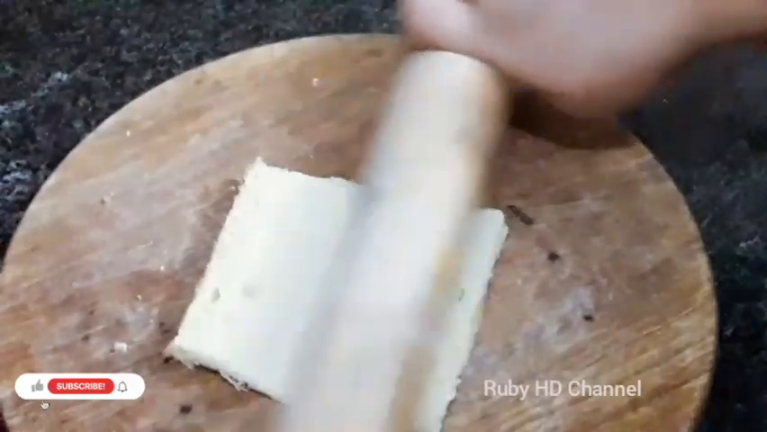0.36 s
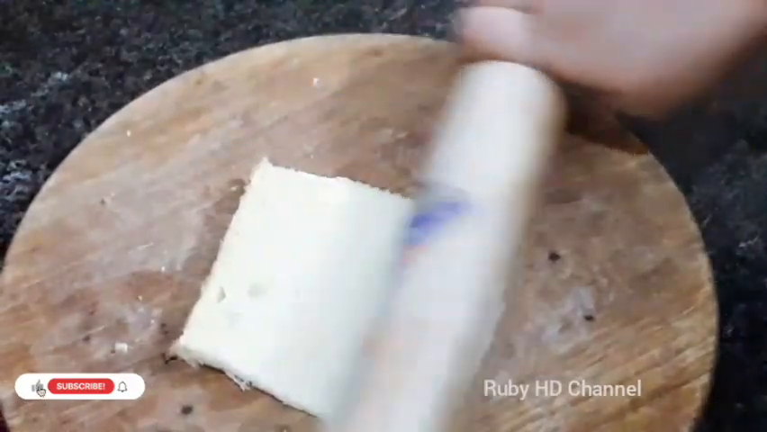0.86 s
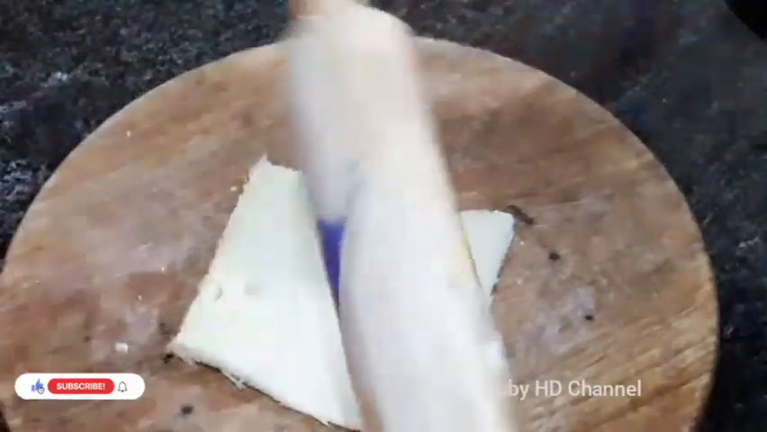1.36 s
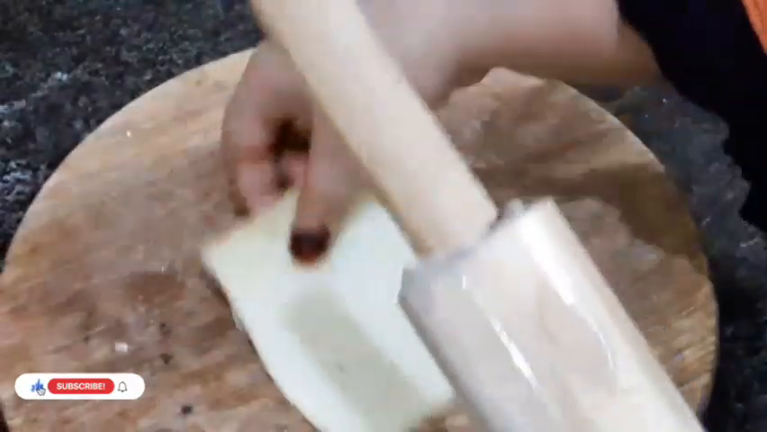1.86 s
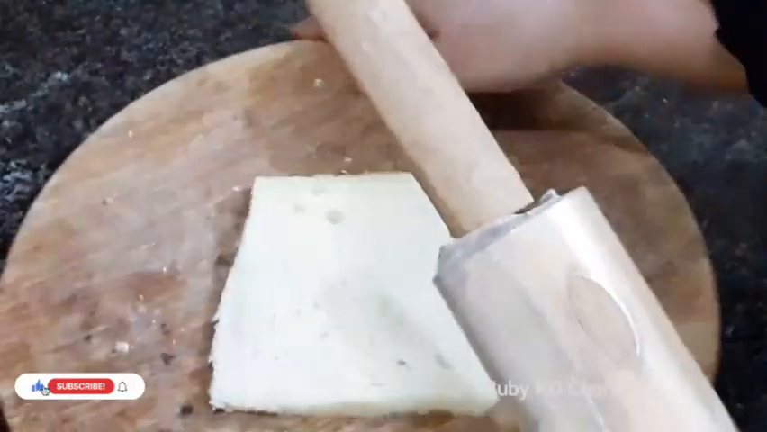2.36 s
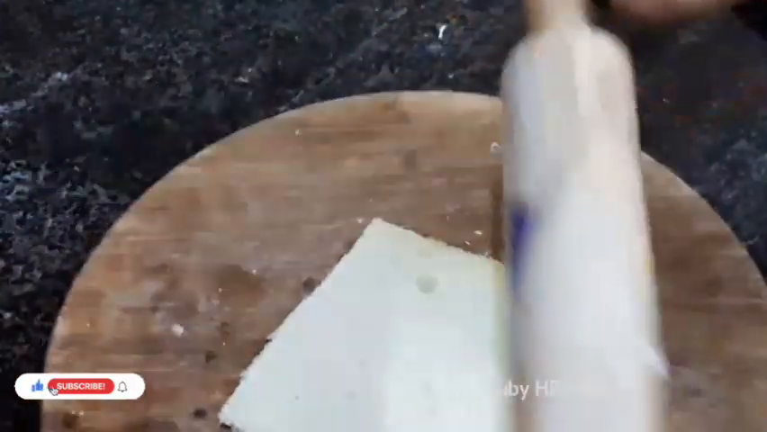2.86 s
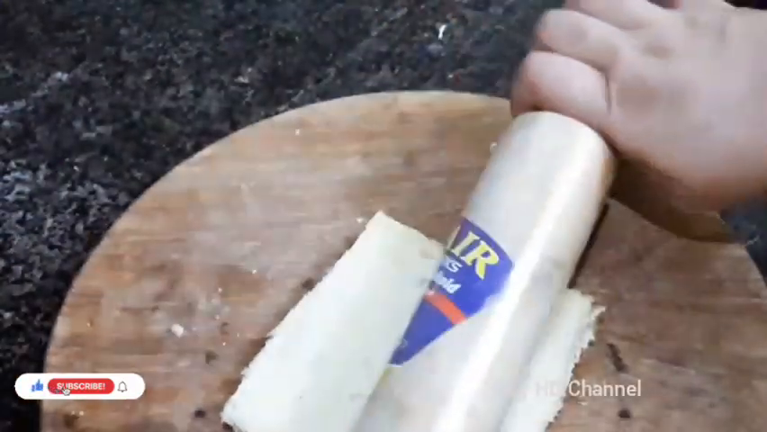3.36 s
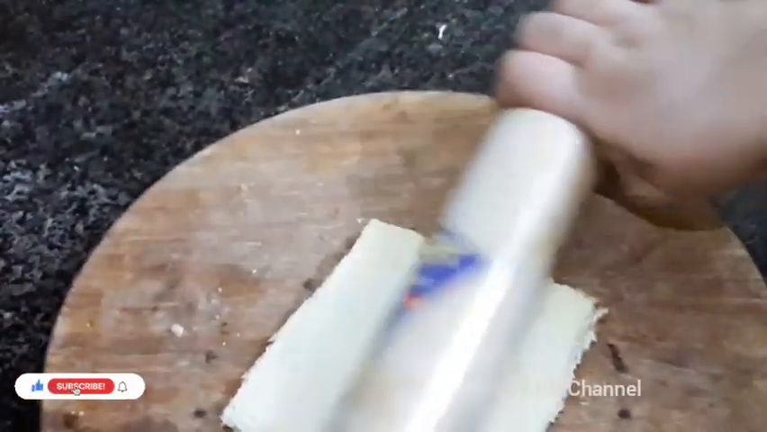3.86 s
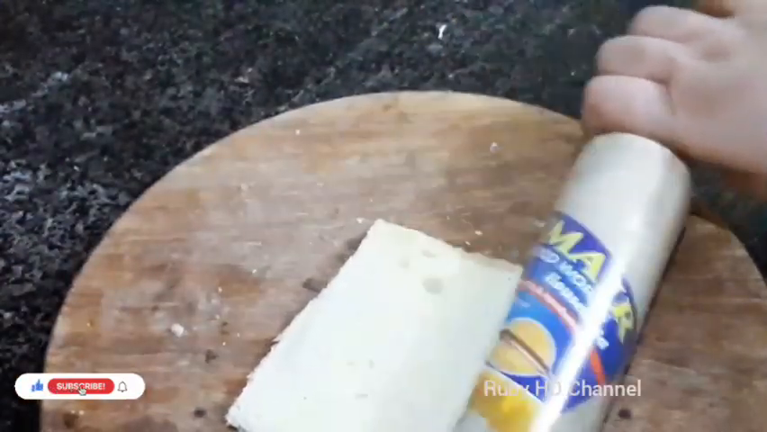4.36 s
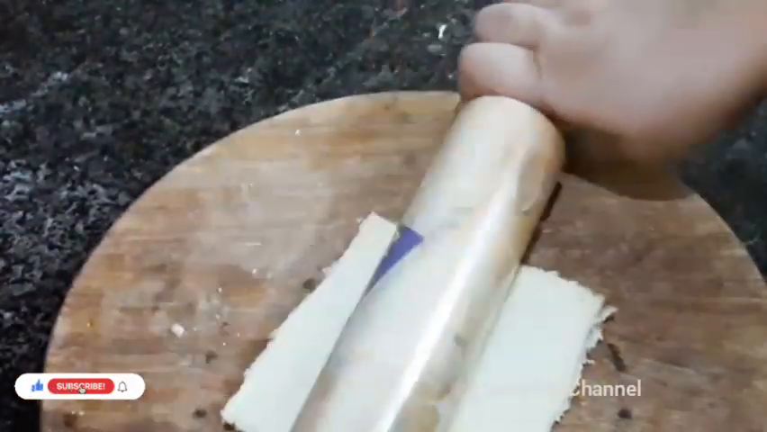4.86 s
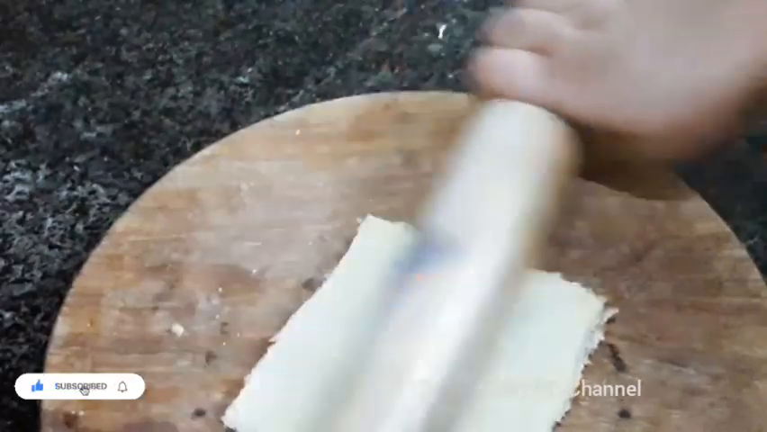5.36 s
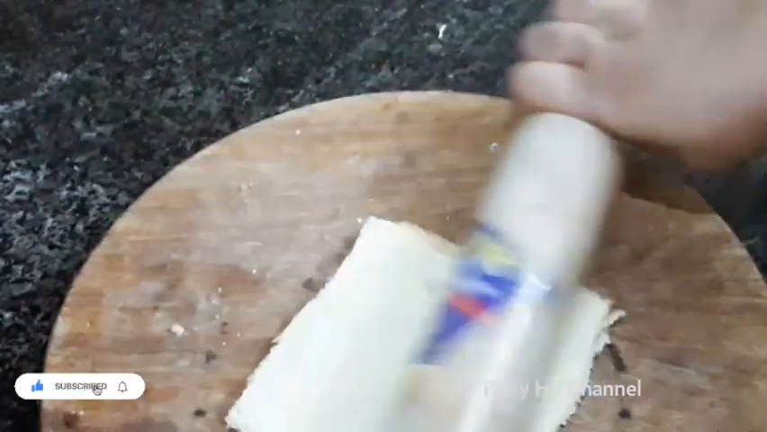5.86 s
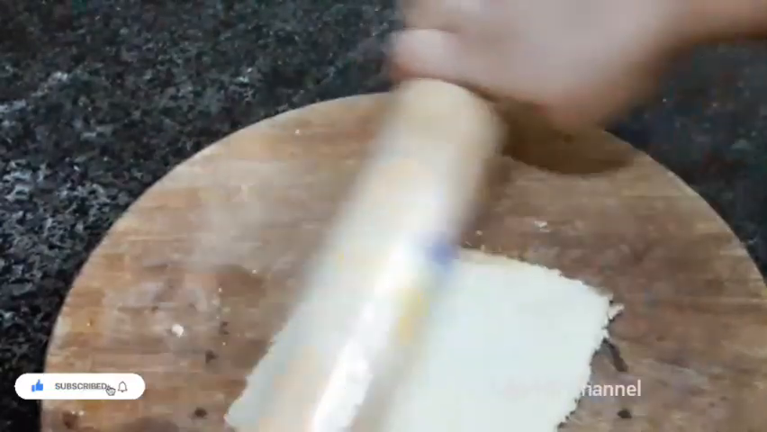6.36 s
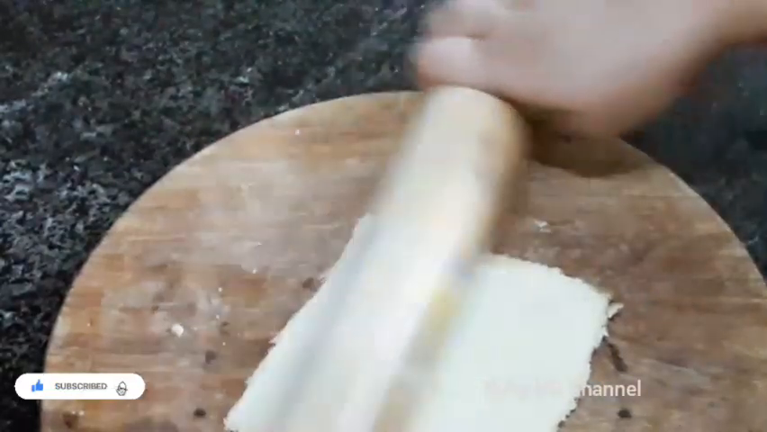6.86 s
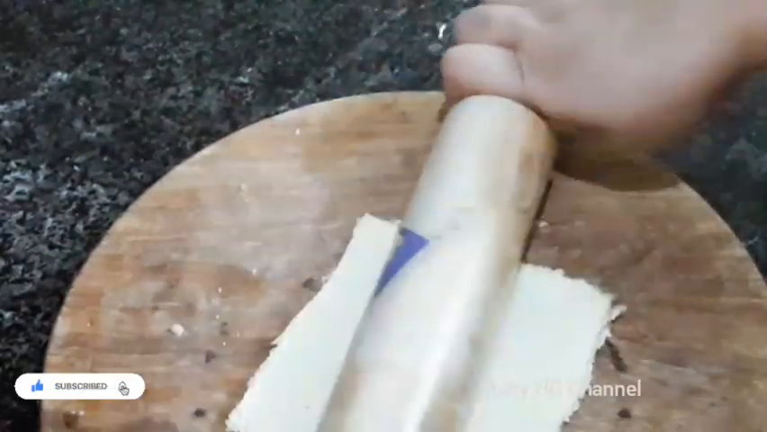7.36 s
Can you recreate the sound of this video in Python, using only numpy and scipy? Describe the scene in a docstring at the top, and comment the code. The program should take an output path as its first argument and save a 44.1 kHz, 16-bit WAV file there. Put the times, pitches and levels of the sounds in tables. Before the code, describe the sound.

A rolling pin whispers to and fro on a wooden board, interrupted by sharp dish clinks and a short scrape, then rolls harder.

```python
"""In a live kitchen a wooden pin rolls to and fro over bread on a round board, palms rubbing its handles.
Rolling is stick-slip noise in spectral layers, swelling with each stroke; the handles squeak as gliding tones.
Puffs of resonant noise make ticks, bumps and thuds; coarse slips drag the board once over a low groan that
moves on as thuds under the crockery; hard crockery clinks as ringing modes. Filtered noise gives a low thrum,
a faint whistle, hum and hiss under all."""
import sys
import numpy as np
from scipy import signal
from scipy.fft import rfft, irfft
from scipy.io import wavfile
from scipy.ndimage import uniform_filter1d

SR = 44100
rng = np.random.default_rng(int(sys.argv[2]) if len(sys.argv) > 2 else 0)


def to_linear_factor(level_db):
    """Convert decibel levels (scalar or array-like) to linear amplitude factors."""
    exponent = np.asarray(level_db, float) / 20
    return 10 ** exponent


def master_out(mix):
    """Clip the mix to full scale and print it as 16-bit PCM to the path in sys.argv[1]."""
    frames = np.transpose(np.atleast_2d(mix))
    ceiling = np.clip(frames, -1, 1)
    pcm = np.round(ceiling * 32767).astype(np.int16)
    wavfile.write(sys.argv[1], SR, pcm)


N = 329438  # length of the scene in samples

# spectra of the rub, the rasp, the top hiss and the deep rasp: (frequency [Hz], density [dB per Hz])
RUB_COLOUR = [(2060, -74), (3500, -22.5), (4160, 1), (4840, 6), (5620, 7), (6930, 3), (7300, 1.5),
              (8220, -21.5), (9000, -65), (11700, -51), (19800, -120)]
RASP_COLOUR = [(1500, -29), (2100, -5), (2600, 6.5), (3200, 11.5), (3800, 9.5), (4500, -20)]
HISS_COLOUR = [(5000, -21), (8500, -4.5), (9980, -1.5), (11000, 2.5), (13600, 4.5), (15800, -5)]
DEEP_COLOUR = [(600, -43), (1000, -11.5), (1400, -10.5), (1900, 2), (2300, 5), (3000, -59)]
# strokes of pin and hands: (start [s], length [s], place of the peak [0-1], rub level [dB],
# rasp above the rub [dB], top hiss above the rub [dB])
STROKES = [(-0.03, 0.066, 0.63, -60, -17, -16), (0.01, 0.17, 0.5, -63.3, -2.5, -15),
           (0.242, 0.14, 0.29, -54, -10.5, -12), (0.371, 0.18, 0.34, -55.5, -6, -10.5),
           (0.536, 0.18, 0.48, -58.5, -7, -6), (0.7, 0.17, 0.32, -59, -3, -8.2),
           (0.884, 0.24, 0.26, -55.5, -9.5, -6), (1.673, 0.155, 0.37, -73.5, -12, -10),
           (1.8, 0.14, 0.07, -66.4, -8, -19), (1.89, 0.34, 0.47, -63.5, -15, -10),
           (2.317, 0.195, 0.15, -62.5, -17, -15), (3.439, 0.17, 0.24, -46, -9, -12.5),
           (3.638, 0.24, 0.3, -47, -15.5, -13.5), (3.785, 0.23, 0.46, -45.5, -11.5, -13.5),
           (3.952, 0.25, 0.26, -47.6, -13.5, -15), (4.072, 0.23, 0.58, -49, -11.5, -15),
           (4.268, 0.25, 0.16, -48, -14.5, -13), (4.431, 0.33, 0.2, -48.5, -11.5, -11.5),
           (4.747, 0.196, 0.42, -62.5, -13, -6.5), (4.9, 0.2, 0.4, -64, -18, -4),
           (5.098, 0.21, 0.53, -44.5, -14, -12), (5.251, 0.25, 0.61, -44.2, -12, -11.5),
           (5.514, 0.25, 0.38, -45, -13.5, -11.5), (5.713, 0.21, 0.49, -48.5, -14, -11),
           (5.877, 0.26, 0.14, -50, -13.5, -8.5), (6.074, 0.34, 0.28, -45, -9, -10.5),
           (6.289, 0.4, 0.41, -60.5, -10, -9.1), (6.483, 0.24, 0.37, -58, -5.5, -6.2),
           (6.674, 0.29, 0.35, -56.5, -13.5, -7.5), (6.836, 0.2, 0.38, -59, -17.5, -3.1),
           (6.983, 0.22, 0.66, -41.5, -12.5, -11.5), (7.169, 0.26, 0.61, -45.5, -10.5, -11.5),
           (7.361, 0.16, 0.61, -45.1, -12, -11)]
# the arch of every stroke, a row each for rub, rasp and top hiss: (delay [s], sharpness [exponent])
STROKE_ARCHES = [(0.0012, 3.4), (0.017, 2.37), (0.0022, 4)]
# moments when the rubbing bites deeper: (time [s], deep rasp level [dB], burst of rub level [dB])
GRINDS = [(.285, -74, -57), (1.81, -71, -74), (3.48, -55, -50), (3.68, -75, -48), (3.895, -59, -51),
          (4.03, -69.5, -51), (4.52, -70, -47.5), (4.61, -68, -58), (5.205, -63.5, -43), (5.4, -63, -47.5),
          (5.62, -69.5, -55), (5.83, -81, -51.5), (6.175, -53.5, -44), (6.26, -64, -64), (6.54, -70, -58.5),
          (7.115, -59, -39.5), (7.333, -53.5, -44), (7.46, -63, -48)]


def rolling():
    """One train of stick-slip clicks feeds the two rasps, the rub and the top hiss."""
    drive = slips(5000, spread_db=0.0, smooth=2.4)
    rub = coloured(drive, RUB_COLOUR, patchy_db=4.0)
    rasp = coloured(drive, RASP_COLOUR, patchy_db=2.5)
    hiss = coloured(drive + 3.1 * rng.standard_normal(N), HISS_COLOUR, patchy_db=2.0)
    deep_rasp = coloured(drive, DEEP_COLOUR, patchy_db=3)

    peak, rub_db, rasp_db, hiss_db = np.transpose(STROKES)[2:]
    levels_db = [rub_db, rub_db + rasp_db, rub_db + hiss_db]
    rub_gain, rasp_gain, hiss_gain = [arches(STROKES, db, peak, sharp, delay_s)
                                      for db, (delay_s, sharp) in zip(levels_db, STROKE_ARCHES)]

    burst = swells(GRINDS, 2, rise_db_per_s=602, fall_db_per_s=282)
    burst_hiss_db = -10.5  # against the burst of rub
    rub_gain = np.hypot(rub_gain, burst)
    hiss_gain = np.hypot(hiss_gain, to_linear_factor(burst_hiss_db) * burst)
    deep_gain = swells(GRINDS, 1, rise_db_per_s=458, fall_db_per_s=160)
    return rub_gain * rub + rasp_gain * rasp + hiss_gain * hiss + deep_gain * deep_rasp


# the handle squeaks in the palm: (start [s], length [s], level [dB], first pitch [Hz], last pitch [Hz])
SQUEAKS = [(0.971, .075, -67, 3580, 3550), (1.043, .06, -65, 3360, 3750), (5.157, .065, -61.5, 2900, 2150),
           (5.269, .065, -64.5, 2587, 2445), (5.384, 0.038, -61, 1820, 1900),
           (5.423, .07, -70.5, 1200, 1194), (5.593, 0.067, -56, 3180, 3030)]


def squeaks():
    """Regular stick-slip: a thin gliding tone that wavers a little."""
    start, length, db, first_hz, last_hz = np.transpose(SQUEAKS)
    times = np.c_[start, start + length].ravel()
    pitches = np.c_[first_hz, last_hz].ravel()
    hz = np.interp(np.arange(N) / SR, times, pitches)
    waver = 1 + .02 * evened(uniform_filter1d(rng.standard_normal(N), 150))
    tone = np.sqrt(2) * np.sin(2 * np.pi * np.cumsum(hz * waver) / SR)
    return arches(SQUEAKS, db, peak=0.57, sharp=.7) * tone


# small ticks, bumps and thuds of pin, crumbs, board and struck crockery:
# (time [s], peak level [dB], centre [Hz], width of each resonance pass [share of centre], t60 of the puff [s])
TICKS = [(1.170, -43, 1600, 1.1, 0.13), (1.19, -46, 546, 1.5, 0.15), (1.543, -49.5, 420, 3.3, .03),
         (1.802, -49, 2960, 1.8, 0.024), (2.326, -53, 6300, 0.48, .03), (2.322, -47, 99, 0.57, .45),
         (2.408, -50, 1890, 0.52, .02), (2.52, -32.5, 2400, 0.66, 0.016), (2.628, -36, 2680, 0.6, 0.0086),
         (3.006, -22.5, 5230, .6, 0.027), (3.292, -50.5, 236, .3, 0.27), (3.457, -32, 3040, 1.5, .021),
         (4.458, -44, 6005, 0.43, .02), (5.242, -30.5, 5140, 0.39, .01), (5.385, -44, 5500, 0.33, .0083),
         (5.399, -42, 5370, .4, .01), (6.098, -39.5, 6900, 1.5, 0.041), (6.127, -30.5, 5970, 0.35, 0.014),
         (6.162, -32, 5950, 0.72, 0.011), (6.8235, -32.5, 8650, 1.2, 0.0048),
         (7.099, -32, 5950, 0.55, 0.022)]


def ticks():
    """A short puff of noise through one broad, steep resonance."""
    out, t = np.zeros(N), np.arange(SR // 4) / SR
    for s, peak_db, hz, share, t60 in TICKS:
        puff = rng.standard_normal(len(t)) * to_linear_factor(-60 * t / t60) * np.minimum(t / 0.0009, 1)
        tick = np.gradient(puff)  # small things radiate no bass
        for _ in range(4):
            tick = resonate(tick, hz, share * hz)
        add(out, s, to_linear_factor(peak_db) * tick / abs(tick).max())
    return out


# the board dragged round: (time [s], level [dB], treble against that level [dB])
DRAG = [(2.36, -75, 14), (2.398, -74, 7), (2.412, -59.5, 2), (2.548, -46, -8.5), (2.634, -42, -13),
        (2.646, -49.5, -5.5), (2.766, -60, 1), (2.876, -82.5, -15), (2.97, -68, 9.5)]
# spectra of the scrape's body and treble: (frequency [Hz], density [dB per Hz])
DRAG_COLOUR = [(470, -29), (800, -11.5), (965, 0.5), (1540, -6), (1710, 3), (2330, -4.5), (2640, 0),
               (3050, -9.5), (3620, -4), (4500, -12), (5850, -43), (9900, -120)]
DRAG_TREBLE_COLOUR = [(2060, -41), (3500, -4), (4280, -9), (4680, -2.5), (6770, -8), (8290, -24.5),
                      (13300, -28), (14500, -23.5), (16000, -38.5)]
# a low groan that climbs, sinks, and moves on as low thuds under the crockery blows:
# (time [s], level [dB], centre [Hz])
GROAN = [(2.36, -67, 354), (2.542, -64, 635), (2.636, -47.5, 660), (2.686, -65, 530), (2.724, -57, 410),
         (2.932, -64, 410), (3.0, -57.5, 500), (3.2, -70.5, 410), (3.45, -81.5, 320)]


def drag():
    """Coarse slips of wood over stone; a moving resonance makes the low groan and the thuds after it."""
    drive = slips(2000, spread_db=3.5, smooth=1.0)
    body = coloured(drive, DRAG_COLOUR, patchy_db=2)
    treble = coloured(drive + 3 * rng.standard_normal(N), DRAG_TREBLE_COLOUR, patchy_db=1.5)
    scrape = curve(DRAG, 1) * (body + curve(DRAG, 2) * treble)

    hz = np.interp(np.arange(N) / SR, *np.transpose(GROAN)[::2])
    groan = evened(resonate(resonate(drive, hz, 121), hz, 160))
    return scrape + curve(GROAN, 1) * groan


# clinks: (time [s], peak level [dB], favoured mode [Hz], its lift [dB],
# low family [dB], upper family [dB], top family [dB])
CLINKS = [(1.190, -12.5, 3170, 11.2, -3.5, -7, -15), (2.9835, -24.5, 2806, 9.4, -5.5, -11.5, -15),
          (3.006, -11, 2885, 13, -5, -5, -9.5), (3.188, -3, 3120, 3.9, -3.5, 1, -4)]
# modes the crockery rings with: (frequency [Hz], level [dB], t60 of the slow fall [s])
DISH_MODES = [(1090, -13, .4), (1250, -12, .45), (1611, -7, .4), (1810, -15, .4), (2164, -6, .45),
              (2330, -16, .3), (2575, -14, .4), (2798, -9, .3), (2870, -7, .25), (2902, -1, .3),
              (3047, -4, .45), (3106, -5, .4), (3170, -6, .38), (3208, -4, .5), (3417, -5, .4),
              (3600, -21, .3), (4240, -13, .2), (4430, -12, .33), (4513, -2, .28), (4635, -7, .25),
              (4830, -9, .25), (4948, -1, .3), (5142, -12, .25), (5870, -13, .25), (6033, -9, .4),
              (6125, -8, .35), (6557, -3, .4), (6655, -5, .35), (6794, -13, .25)]
# borders between the low, middle, upper and top mode families: [Hz]
FAMILY_BORDERS = [2450, 3900, 5500]
# the unpitched part of a blow: (frequency [Hz], density [dB per Hz])
CRACK_COLOUR = [(400, -30), (880, -25), (1050, -11.5), (1600, -13.5), (2150, -10.5), (2450, -10),
                (3150, -2), (3800, -19.5), (4550, -7), (5000, -12.5), (5500, -16), (6050, -7.5),
                (6700, -9.5), (8400, -32.5), (13000, -33.5), (15500, -57)]


def clinks():
    """Each blow rings the same modes; the spot struck picks the families and one favourite."""
    out, t = np.zeros(N), np.arange(SR // 2) / SR
    hz, db, t60 = np.transpose(DISH_MODES)
    mode_family = np.searchsorted(FAMILY_BORDERS, hz)
    wash_family = np.searchsorted(FAMILY_BORDERS, np.fft.rfftfreq(len(t), 1 / SR))
    rattle = coloured(rng.standard_normal(N), CRACK_COLOUR, patchy_db=0.5)
    # contact damps the ring at first: a quick fall, then the slow one
    fall = to_linear_factor(-60 * t[:, None] / t60) * (0.19 + to_linear_factor(-60 * t[:, None] / 0.093))
    wash_fall = 0.72 * to_linear_factor(-60 * t / 0.54) + to_linear_factor(-60 * t / 0.16)

    for s, peak_db, favoured_hz, lift_db, low_db, upper_db, top_db in CLINKS:
        family_db = np.array([low_db, 0, upper_db, top_db])
        lift = lift_db * np.exp(-((hz - favoured_hz) / 60) ** 2)
        phase = rng.random(len(hz))
        modes = fall * np.sin(2 * np.pi * (hz * t[:, None] + phase))
        ring = modes @ to_linear_factor(db + family_db[mode_family] + lift)
        # countless small modes and rattles merge into a dying wash
        piece = rattle[round(s * SR):][:len(t)]
        wash = irfft(rfft(piece) * to_linear_factor(family_db[wash_family]), len(t))
        blow = ring + to_linear_factor(-5) * wash * wash_fall
        blow *= np.minimum(t / 0.00049, 1)
        add(out, s, to_linear_factor(peak_db) * blow / abs(blow).max())
    return out


# slowly changing level of the low hum: (time [s], table level [dB], board level [dB])
HUM = [(0.0, -68.5, -72.5), (1.89, -65, -70), (3.16, -66.5, -63.5), (3.49, -66, -76.5), (4.83, -70.5, -75),
       (5.08, -66, -70.5), (5.6, -63.5, -77), (7.47, -69.5, -73.5)]
# weight comes down on the board: (time [s], table level [dB], board level [dB])
PRESSES = [(.06, -64, -78), (.44, -79, -89), (.66, -63, -64), (1.33, -72.5, -76), (1.62, -67.5, -69),
           (1.999, -65.5, -68.5), (2.35, -58.5, -62), (2.579, -66, -71), (3.29, -58, -64),
           (4.03, -63.5, -73), (4.31, -58, -67), (4.849, -79, -68), (5.21, -57, -58.5), (5.43, -72, -79),
           (5.6, -62, -61), (5.78, -63, -64), (6.05, -70, -57.5), (6.26, -58.5, -57.5), (6.53, -55.5, -62),
           (6.78, -66, -77), (7.12, -54, -58), (7.47, -60, -62)]


def load(column):
    """The slowly changing hum plus a swell at each press, added by power."""
    presses = swells(PRESSES, column, rise_db_per_s=154, fall_db_per_s=93)
    return np.hypot(curve(HUM, column), presses)


# modes of table and board: (frequency [Hz], width at half amplitude [Hz], relative level [dB])
TABLE_MODES = [(101, 46, -3.5), (145, 10, -1.5), (195.4, 39, -4.5)]
BOARD_MODES = [(267, 100, 8.5), (339.8, 20, 2.5), (417, 55, 0.5), (500, 98, -4.5)]


def thrum():
    """The load shakes table and board; left and right hear it almost alike."""
    table_gain, board_gain = load(column=1), load(column=2)
    mid, side = (table_gain * shaken(TABLE_MODES) + board_gain * shaken(BOARD_MODES) for _ in range(2))
    return mid + to_linear_factor(-29.5) * np.array([side, -side])


def shaken(modes):
    """Modes kept going by a random load: noise shaped by resonance peaks."""
    f = np.fft.rfftfreq(N, 1 / SR)
    gain = sum(to_linear_factor(db) / np.sqrt(width) / (1 + (2 * (f - hz) / width) ** 2) for hz, width, db in modes)
    return evened(irfft(rfft(rng.standard_normal(N)) * gain, N))


# a faint narrow hiss that comes and goes: (start [s], length [s], level [dB], place of the peak [0-1])
WHISTLES = [(1.79, 0.17, -68, 0.06), (1.952, 0.35, -73.5, 0.5), (2.83, 0.086, -64, 0.15),
            (6.273, 0.393, -66, 0.3)]


def whistle():
    """Noise through two passes of a narrow resonance whose centre wavers."""
    centre_hz, pass_width_hz = 3500, 170
    hz = centre_hz * (1 + 0.017 * evened(uniform_filter1d(rng.standard_normal(N), SR // 20)))
    band = resonate(resonate(rng.standard_normal(N), hz, pass_width_hz), hz, pass_width_hz)
    level_db, peak = np.transpose(WHISTLES)[2:]
    return arches(WHISTLES, level_db, peak, sharp=0.47) * evened(band)


# how long the room rings: (frequency [Hz], t60 [s])
KITCHEN_T60 = [(250, .35), (1000, 0.56), (2000, 0.43), (4000, 0.38), (7000, 0.41), (12000, 0.46)]


def kitchen(x):
    """Room tail: sparse taps of random sign, each band dying at its own speed."""
    taps = np.zeros(SR)
    at = np.arange(180, SR - 20, 20)
    taps[at + rng.integers(0, 20, len(at))] = rng.choice([-1., 1.], len(at))
    hz, t, z = signal.stft(taps, SR, nperseg=256)
    fall = to_linear_factor(-60 * t / read(KITCHEN_T60, hz)[:, None])
    tail = signal.istft(z * fall, SR, nperseg=256)[1]
    return signal.fftconvolve(x, tail / np.linalg.norm(tail))[:N]


# spectra of what both sides share and of what differs left and right: (frequency [Hz], density [dB per Hz])
FLOOR_COLOUR = [(15, -37.5), (30, -19.5), (148, -11.5), (342, -13), (672, -14), (1680, -21), (3130, -18),
                (3580, -16), (4330, -22.5), (4950, -11), (5670, -15), (6850, -10.5), (8490, -35),
                (13400, -18), (15800, -33.5)]
SIDE_COLOUR = [(15, -39), (25, -15), (101, -0.5), (411, -6), (650, -9.5), (923, -10.5), (1960, -14.5),
               (3550, -7), (5310, -9), (9350, -16.5), (11600, -34.5), (13600, -15.5), (15600, -10)]


def floor():
    """Hum and hiss of the room, and the microphones' own noise that differs left and right."""
    mid_db, side_db = -65, -75.5
    hz = np.fft.rfftfreq(N, 1 / SR)
    colours = to_linear_factor([read(FLOOR_COLOUR, hz), read(SIDE_COLOUR, hz)])
    mid, side = irfft(rfft(rng.standard_normal((2, N))) * colours, N)
    return to_linear_factor(mid_db) * evened(mid) + to_linear_factor(side_db) * evened(side) * [[1], [-1]]


def slips(per_s, spread_db, smooth):
    """Stick-slip friction: tiny clicks over smooth noise; a larger spread makes a few of them large."""
    size = to_linear_factor(spread_db * np.minimum(rng.exponential(1, N), 5)) * (rng.random(N) < per_s / SR)
    return evened(size * rng.standard_normal(N)) + smooth * rng.standard_normal(N)


def resonate(x, hz, width):
    """Shifts hz down to zero, smooths, and shifts back: a resonance of gain 1."""
    turn = np.exp(2j * np.pi * np.cumsum(hz * np.ones(len(x))) / SR)
    r = np.exp(-np.pi * width / SR)
    return 2 * (turn * signal.lfilter([1 - r], [1, -r], x / turn)).real


def coloured(x, points, patchy_db=0):
    """Imposes a spectrum, with drifting patches of more and less level; rms 1."""
    hz, t, z = signal.stft(x, SR, nperseg=512, noverlap=384)
    blur = uniform_filter1d(rng.standard_normal(z.shape), 7, 0)
    patches = evened(uniform_filter1d(blur, 14, 1))
    gain = to_linear_factor(read(points, hz)[:, None] + patchy_db * patches)
    return evened(signal.istft(z * gain, SR, nperseg=512, noverlap=384)[1][:N])


def arches(rows, db, peak, sharp, delay_s=0):
    """Gain over the scene: one arch for each row (start, length), added by power."""
    power = np.zeros(N)
    for (start, length, *_), top_db, place in zip(rows, db, peak * np.ones(len(rows))):
        first = max(round(start * SR), 0)
        last = min(round((start + length + delay_s) * SR), N)
        at = np.arange(first, last)
        u = np.clip((at / SR - start - delay_s) / length, 0, 1)
        u = u ** (np.log(.5) / np.log(np.clip(place, .05, .95)))  # bends time to put the peak in its place
        power[at] += (to_linear_factor(top_db) * np.sin(np.pi * u) ** sharp) ** 2
    return np.sqrt(power)


def swells(rows, column, rise_db_per_s, fall_db_per_s):
    """Gain over the scene: a rise to each row's time and a slower fall, added by power."""
    t, rows = np.arange(0, N + 64, 64) / SR, np.array(rows)
    since = t[:, None] - rows[:, 0]
    db = rows[:, column] + np.minimum(rise_db_per_s * since, -fall_db_per_s * since)
    return np.interp(np.arange(N) / SR, t, np.sqrt((to_linear_factor(db) ** 2).sum(1)))


def curve(rows, column):
    """One table column as a gain over the scene; silent outside the table's times."""
    t, rows = np.arange(N) / SR, np.array(rows)
    inside = np.minimum(t - rows[0, 0], rows[-1, 0] - t)
    edge = np.clip(inside / .015 + (rows[0, 0] < .01), 0, 1)  # no fade if it starts with the scene
    return to_linear_factor(np.interp(t, rows[:, 0], rows[:, column])) * edge


def read(points, hz):
    """Reads a table on a log-frequency axis."""
    f, value = np.transpose(points)
    return np.interp(np.log(hz + 1), np.log(f + 1), value)


def evened(x):
    """Scales to rms 1."""
    return x / np.sqrt(np.mean(x ** 2) + 1e-20)


def add(mix, s, sound):
    """Mixes a sound in at time s."""
    part = mix[round(s * SR):][:len(sound)]
    part += sound[:len(part)]


def scene():
    """Near sounds are mostly dry; the crockery and the scrape send more into the room."""
    near, crockery, scrape = rolling() + ticks() + squeaks(), clinks(), drag()
    room = kitchen(to_linear_factor(-7) * near + to_linear_factor(-4.5) * crockery + to_linear_factor(-4.5) * scrape)
    return near + crockery + scrape + room + thrum() + whistle() + floor()


def roll_off(x):
    """The treble ends steeply here."""
    return signal.sosfilt(signal.butter(12, 16410, fs=SR, output="sos"), x)


def record(dry):
    """Limits the band to 15650 Hz with a steep low-pass and finishes the mix."""
    low_pass = signal.firwin(255, 15650, fs=SR)
    limited = signal.oaconvolve(dry, low_pass[None], "same")
    return roll_off(limited)


dry = scene()
out = record(dry)
master_out(out)
```